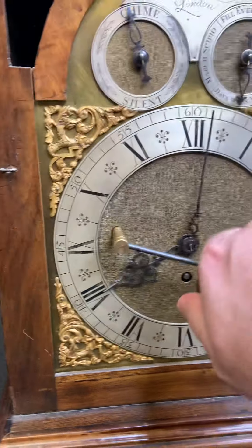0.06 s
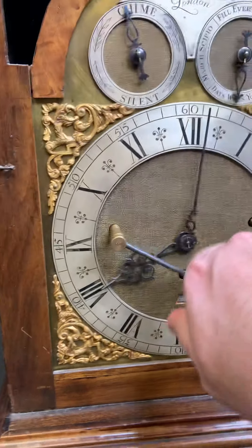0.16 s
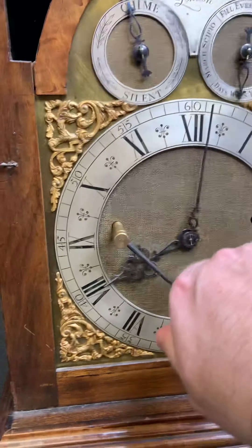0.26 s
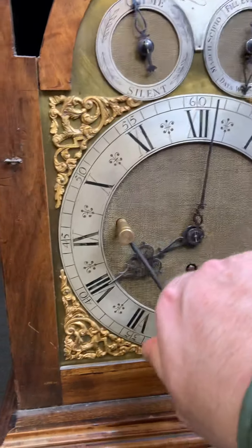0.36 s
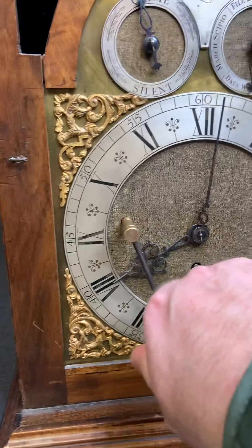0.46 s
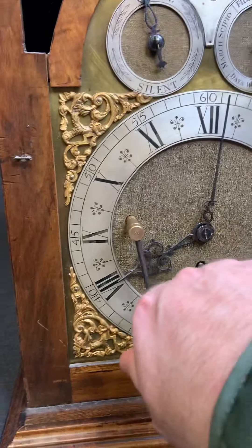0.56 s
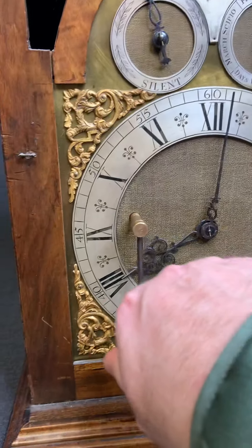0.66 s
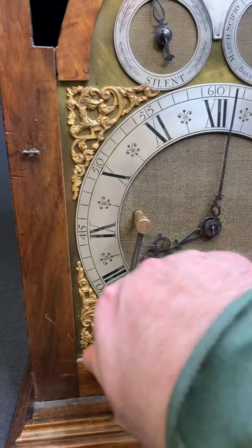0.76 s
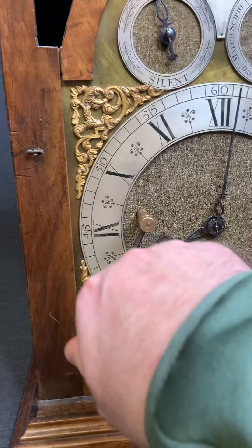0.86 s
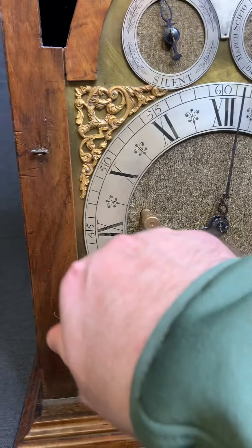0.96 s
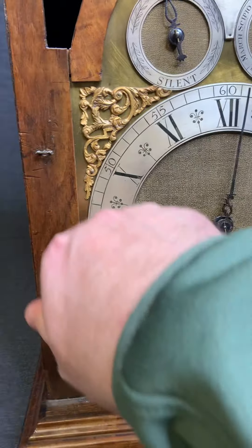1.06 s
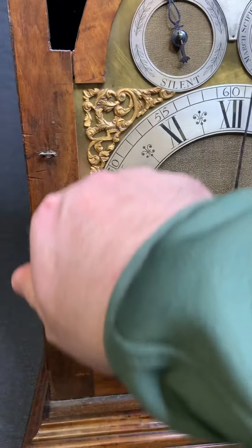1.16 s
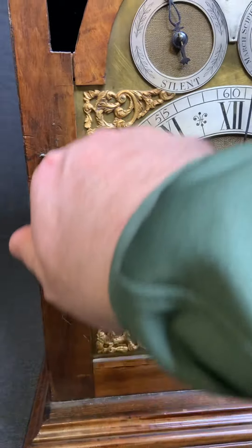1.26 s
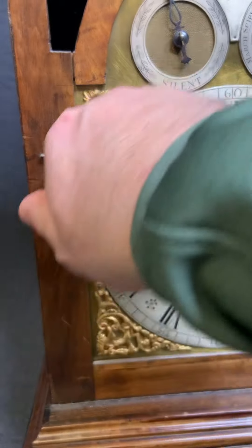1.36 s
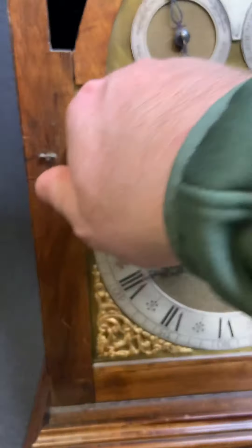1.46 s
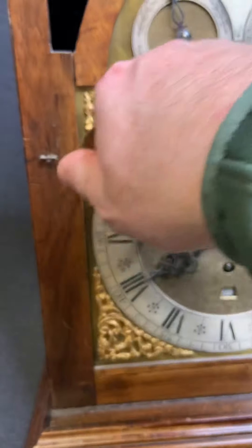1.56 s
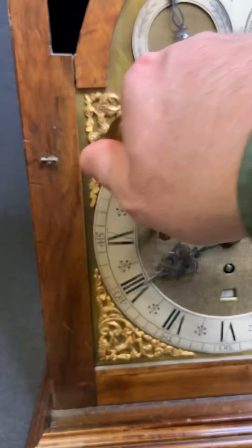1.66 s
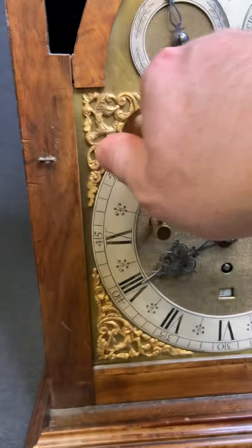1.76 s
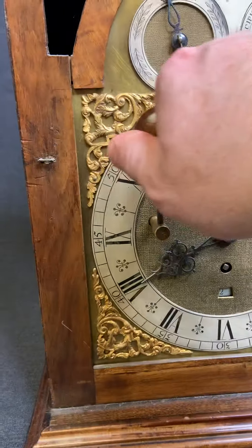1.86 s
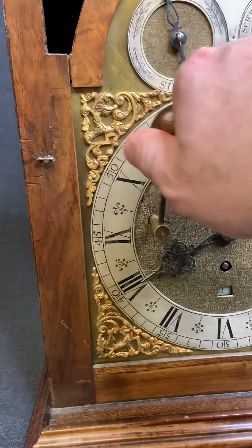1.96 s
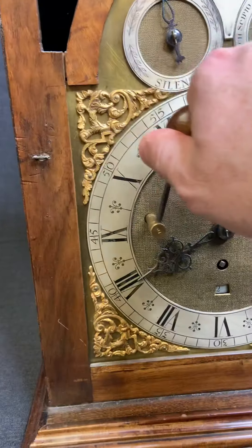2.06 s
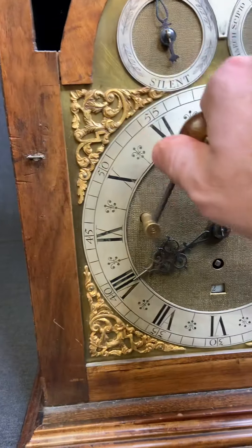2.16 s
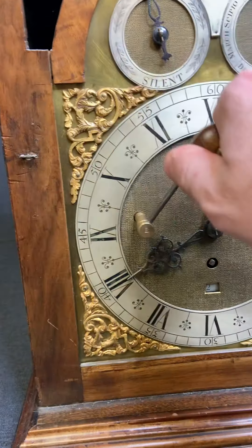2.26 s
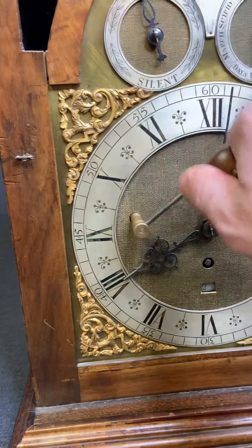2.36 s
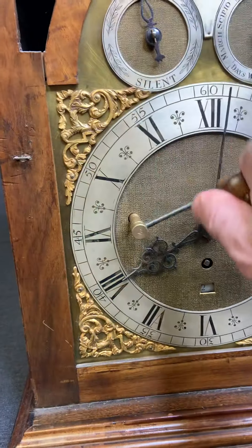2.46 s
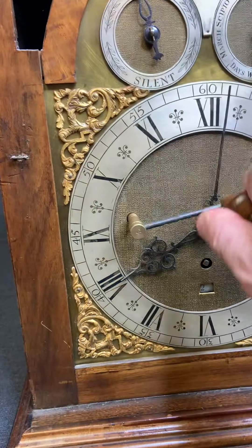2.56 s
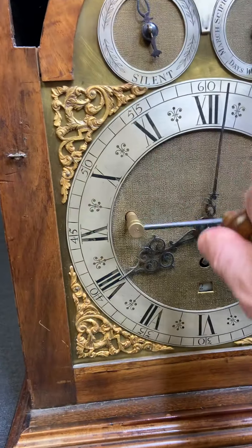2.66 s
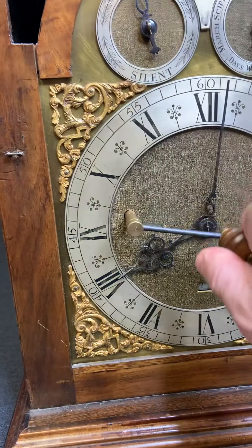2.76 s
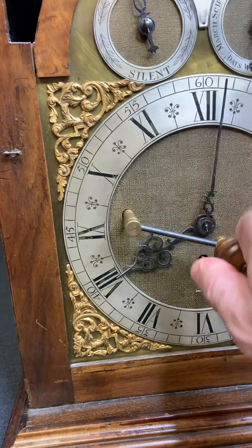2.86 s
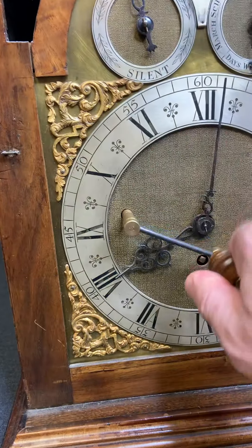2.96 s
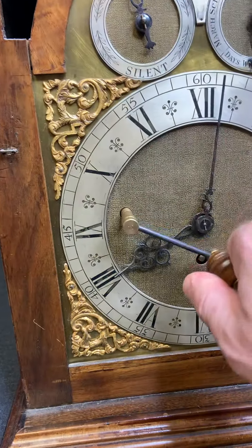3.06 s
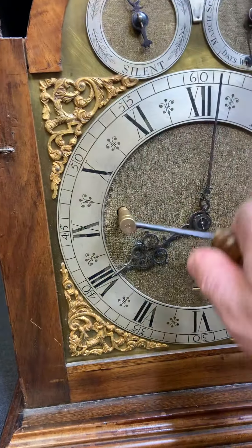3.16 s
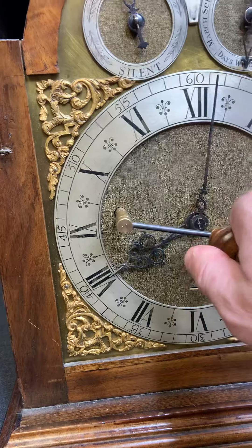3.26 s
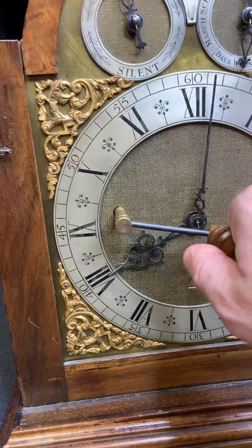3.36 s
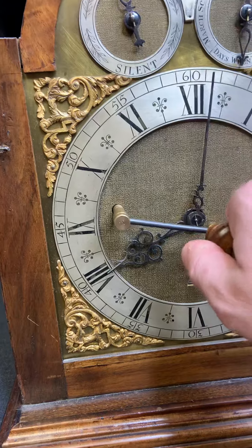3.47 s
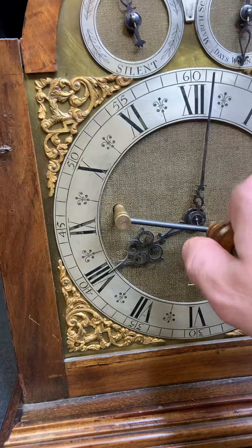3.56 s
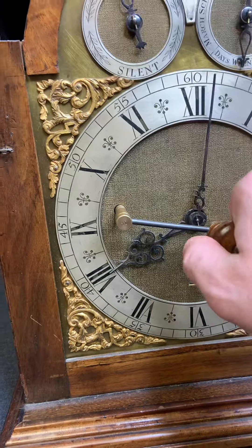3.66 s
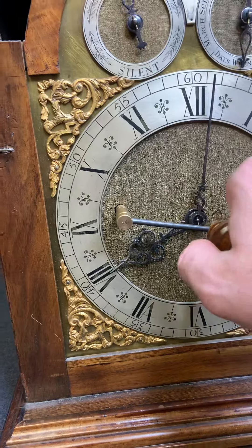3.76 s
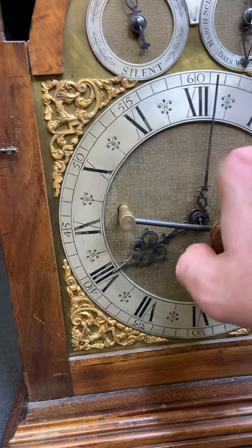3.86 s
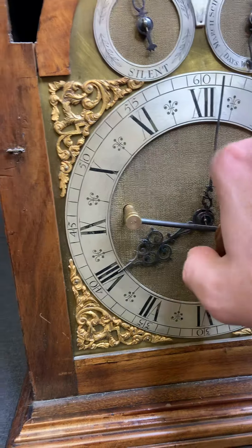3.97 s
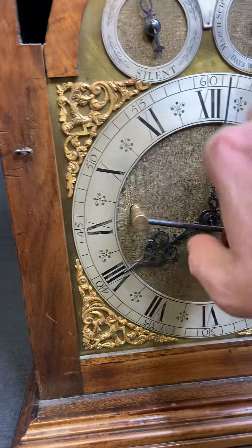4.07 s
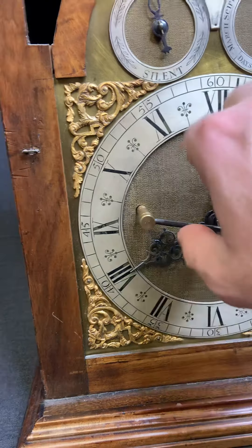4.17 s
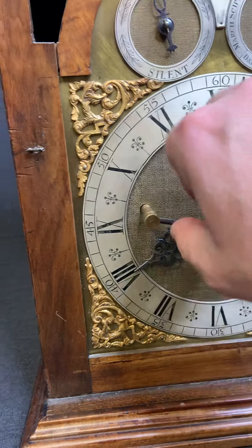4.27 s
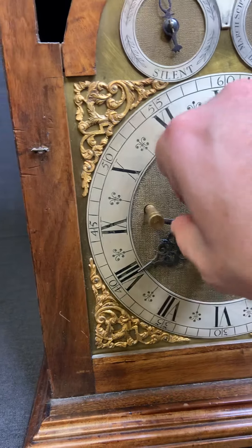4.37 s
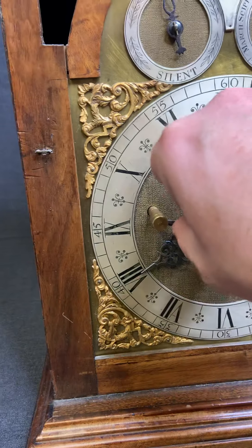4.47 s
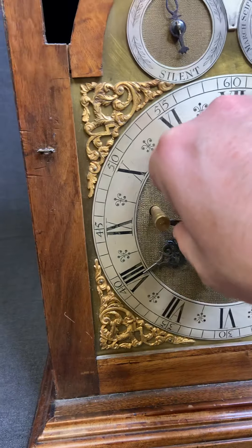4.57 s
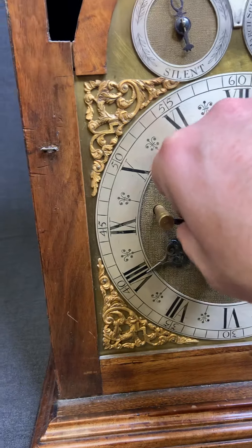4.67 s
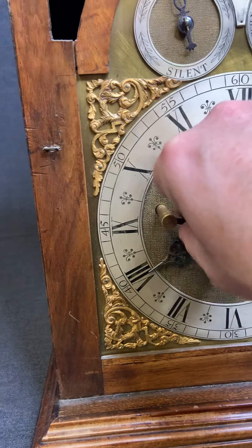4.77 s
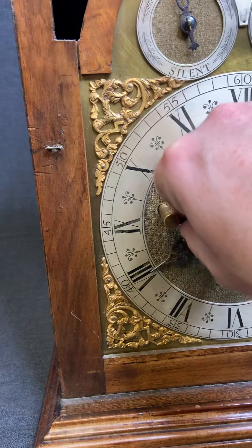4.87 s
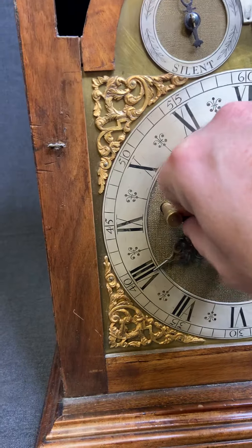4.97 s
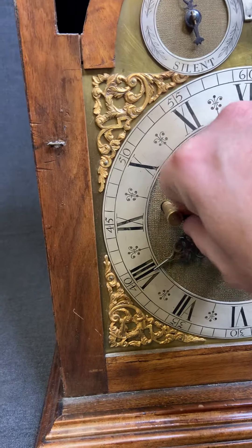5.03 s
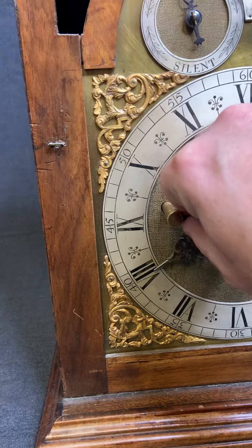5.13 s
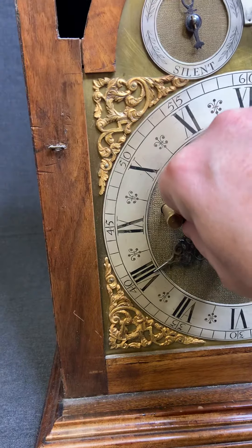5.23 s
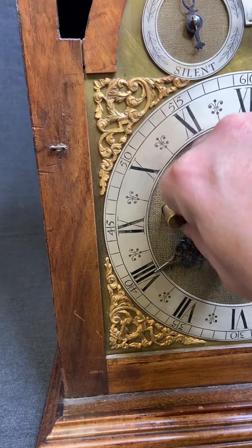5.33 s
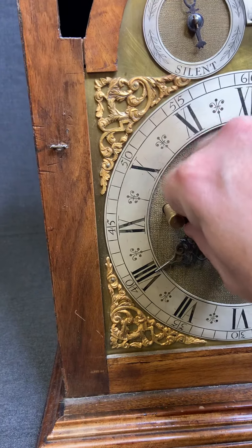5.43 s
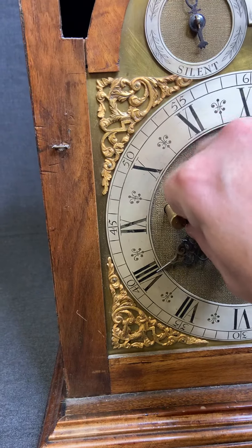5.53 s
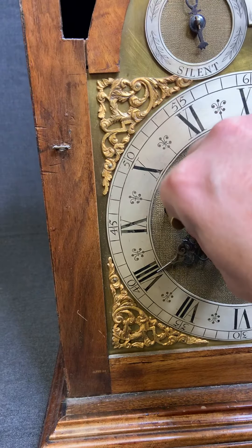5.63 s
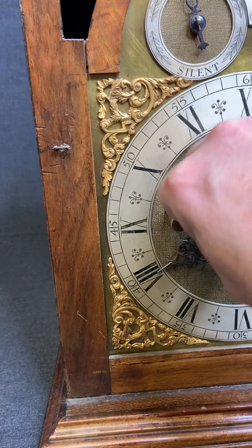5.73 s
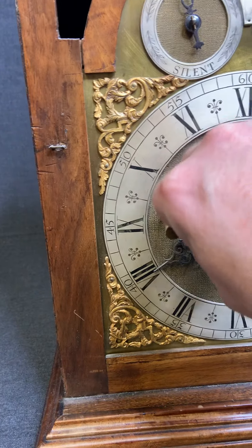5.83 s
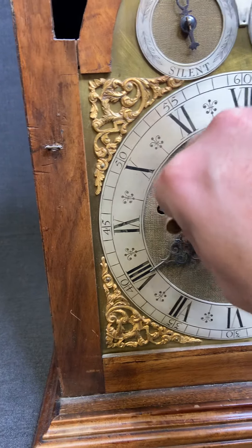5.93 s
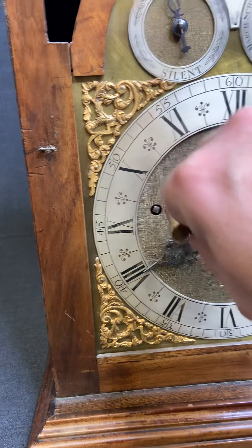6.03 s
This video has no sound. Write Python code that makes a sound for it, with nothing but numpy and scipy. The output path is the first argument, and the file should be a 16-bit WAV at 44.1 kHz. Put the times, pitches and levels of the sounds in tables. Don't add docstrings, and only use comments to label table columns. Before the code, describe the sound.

Crisp rapid ratchet clicks from winding a wooden clock, a clunk and metallic slide back, quiet ticking, then the key bumps free.

```python
import sys
import numpy as np
from scipy import signal
from scipy.fft import rfft, irfft, next_fast_len
from scipy.io import wavfile
from scipy.ndimage import uniform_filter1d, map_coordinates

SR = 44100
rng = np.random.default_rng(int(sys.argv[2]) if len(sys.argv) > 2 else 0)


def gain_from_db(level_db):
    decades = np.asarray(level_db, float) / 20
    return 10 ** decades


def master_out(mix):
    frames = np.transpose(np.atleast_2d(mix))
    ceiling = np.clip(frames, -1, 1)
    pcm = np.round(ceiling * 32767).astype(np.int16)
    wavfile.write(sys.argv[1], SR, pcm)


N = 268999
BANDS_HZ = [0, 1500, 4000, 8200, SR]


def unit(x):
    return x / np.sqrt(np.mean(x ** 2) + 1e-20)


def along(f, v, hz):
    return np.interp(np.log(hz + 1), np.log(np.add(f, 1)), v)


def level_curve(rows):
    s, db = np.transpose(rows)
    silence_db = -70 * np.log(10)
    return np.interp(np.arange(N) / SR, s, db, left=silence_db, right=silence_db)


def wobble(rate_hz):
    knots = rng.standard_normal(int(N * rate_hz / SR) + 4)
    return map_coordinates(knots, [np.arange(N) * rate_hz / SR])


def noise():
    return rng.standard_normal((2, N))


def filtered(x, response):
    size = next_fast_len(N + SR // 2)
    spectrum = rfft(x, size) * response(np.fft.rfftfreq(size, 1 / SR))
    return irfft(spectrum, size)[..., :N]


def ringing(f, modes):
    centre_hz, width_hz, db = np.transpose(modes)
    f = f[:, None]
    sign = (-1) ** np.arange(len(centre_hz))
    damping = 1j * f * width_hz
    h = sign * gain_from_db(db) * damping / (centre_hz ** 2 - f ** 2 + damping)
    return h / np.sqrt(np.mean(np.abs(h.sum(-1)) ** 2))


def body(x, modes):
    return filtered(x, lambda f: ringing(f, modes).sum(-1))


def patches(x, depth_db):
    z = signal.stft(x, nperseg=256)[2]
    field = rng.standard_normal(z.shape[1:])
    field = uniform_filter1d(uniform_filter1d(field, 5, 0), 12, 1)
    return signal.istft(z * gain_from_db(depth_db * unit(field)), nperseg=256)[1][:, :N]


def strikes(events, modes, edges_hz, rise_s, fall_s, rattle_db, part_db, spread_db, soft_hz):
    size = 8192
    hold = 0.39
    grain_db = 3.5
    t, f = np.arange(size) / SR, np.fft.rfftfreq(size, 1 / SR)
    contact = 1 / (1 + 1j * f / soft_hz) ** 3
    out = np.zeros((2, N + size))
    lumps = gain_from_db(grain_db * np.repeat(rng.standard_normal((len(events), size // 64)), 64, axis=1))
    for k, (lo, hi) in enumerate(zip(edges_hz, edges_hz[1:])):
        heavy = max(8000 / hi, 1) ** 0.31
        passed = contact / (1 + 1j * f / (2 * hi))
        part = ringing(f, [m for m in modes if lo < m[0] < hi]) * passed[:, None]
        attack = np.minimum(t / (rise_s * heavy), 1) ** 2.25
        after = np.maximum(t - (1 + hold) * rise_s * heavy, 0)
        blow = gain_from_db(-60 * after / (fall_s * heavy))
        rattle = gain_from_db(rattle_db - 60 * after / 0.22)
        chatter = attack * (blow + rattle)
        for (s, db, *rel_db), lump in zip(events, lumps):
            strength = gain_from_db(spread_db * rng.standard_normal(part.shape[1]))
            if lo > 3000:
                strength = strength * rng.choice([-1, 1], part.shape[1])
            grains = lump * rng.standard_normal((2, size))
            ring = irfft(rfft(chatter * grains) * (part @ strength), size)
            ring = ring * np.linalg.norm(chatter) / np.linalg.norm(ring, axis=1, keepdims=True)
            start = round((s - 0.6 * rise_s) * SR)
            out[:, start:start + size] += gain_from_db(db + [*rel_db, 0][k] + part_db[k]) * ring
    return out[:, :N]


def air():
    # frequency in Hz, density in dB per Hz
    air_density = [(25, -12), (55, -5), (90, 0.8), (160, -10.5), (240, -6.5), (330, -21.5), (450, -27),
                   (750, -38.5), (1500, -39.5), (3500, -42), (6000, -43.5), (11000, -44.5), (15000, -50)]
    # frequency in Hz, width in Hz, rms level in dB
    hum_lines = [(56.7, 20, -63), (118.8, 7.9, -62), (238.8, 38, -69.5)]
    hiss = unit(filtered(noise(), lambda hz: gain_from_db(along(*np.transpose(air_density), hz))))
    out = gain_from_db(-62.0 + 0.17 * wobble(2.93)) * hiss
    for hz, width_hz, db in hum_lines:
        line = [(hz, width_hz, 0)]
        out = out + gain_from_db(db) * unit(body(body(noise(), line), line))
    return out


def room(x):
    # frequency in Hz, t60 in seconds
    decay = [(200, 0.36), (1500, 0.12), (5000, 0.085), (15000, 0.013)]
    out, step = np.zeros((2, N + SR)), SR // 4
    for s in range(0, N, step):
        hz, t, z = signal.stft(rng.standard_normal((2, SR // 3)), SR, nperseg=256)
        t60_s = along(*np.transpose(decay), hz)
        tail = signal.istft(z * gain_from_db(-60 * t / t60_s[:, None]), SR, nperseg=256)[1]
        wet = signal.fftconvolve(x[:, s:s + step], tail / np.linalg.norm(tail[0]), axes=1)
        delay = 200
        out[:, s + delay:s + delay + wet.shape[1]] += wet
    return out[:, :N]


def case_bumps():
    # time in seconds, peak in dB, boom in dB over it
    bumps = [(0.018, -51.5, 9), (3.104, -51, 3.5), (3.88, -65, 17), (4.997, -54.5, -8), (5.423, -53.5, -2),
             (5.592, -50.5, 9), (5.622, -61, 12), (5.646, -62, 15), (5.763, -46, 10), (5.809, -60.5, 14.5),
             (5.831, -56, 5.5), (5.862, -71, 9)]
    # frequency in Hz, width in Hz, level in dB
    case_modes = [(116.6, 46, -5), (187.4, 40, -6.5), (233, 28, -0.5), (306, 34, 1.5), (485, 330, -3),
                  (707, 75, 3), (834, 87, -7.5)]
    return strikes(bumps, case_modes, [0, 400, 1500], rise_s=0.004, fall_s=0.02, rattle_db=-26.5,
                   part_db=[-2.5, -4], spread_db=1.0, soft_hz=844)


def crank_stop():
    # time in seconds, ring in dB, boom and clank in dB over it
    swings = [
        (3.11, -61.5, -3, -13),
        (3.182, -66.5, 27.5, 21.5),
        (3.255, -56, -4.5, -6),
    ]
    # frequency in Hz, width in Hz, level in dB
    arm_modes = [(237, 22, 0), (300, 40, -5), (720, 90, -6), (797, 40, 0), (872, 5.5, 1)]
    return strikes(swings, arm_modes, [0, 400, 840, 1500], rise_s=0.0011, fall_s=0.0107, rattle_db=-20.5,
                   part_db=[6, 6, 6], spread_db=-4.9, soft_hz=1525)


def key_knocks():
    # time in seconds, peak in dB, hardness (treble over middle) in dB
    knocks = [(2.022, -49.5, -25), (3.105, -44.5, -12.5), (3.1773, -35.5, -22.5), (3.185, -54, -26),
              (3.251, -54, 11.5), (3.8483, -43.5, -23), (3.867, -97, 6), (3.8906, -49.5, -21),
              (3.945, -73.5, 15), (5.753, -47, -6.5), (5.804, -54.5, -13.5), (5.8302, -46.5, -27.5)]
    # frequency in Hz, width in Hz, level in dB
    key_modes = [(730, 680, -10.5), (858, 120, -1.5), (1270, 500, -23), (1530, 82, 10), (2120, 470, 6.5),
                 (2870, 70, 12), (3150, 850, 0), (4170, 1200, 9), (5940, 1500, 12), (6590, 450, -23.5),
                 (10800, 6700, 75), (14000, 1800, 10.5)]
    hard_share = (0.17, 0, 0.82, 0.9)
    pin = hard_share[-1]
    over_pin = np.array(hard_share[:-1]) - pin
    blows = [(s, db + hard * pin, *(hard * over_pin)) for s, db, hard in knocks]
    return strikes(blows, key_modes, BANDS_HZ, rise_s=0.0033, fall_s=0.03, rattle_db=-14,
                   part_db=[-9.5, -14.5, -2, -9.5], spread_db=-1.0, soft_hz=53000)


def shaft_pings():
    # time in seconds, peak in dB
    pings = [
        (5.755, -41.5),
        (5.806, -44),
    ]
    # frequency in Hz, width in Hz, level in dB
    shaft_modes = [(2240, 170, 0), (2660, 200, -22)]
    return strikes(pings, shaft_modes, [0, 4000], rise_s=0.00047, fall_s=0.0069, rattle_db=-36,
                   part_db=[0], spread_db=-5.0, soft_hz=20000)


def key_scrape():
    # time in seconds, level in dB
    scrape = [(0.0, -58.5), (0.036, -57), (0.074, -62), (0.125, -67), (0.145, -66)]
    # frequency in Hz, width in Hz, level in dB
    socket_modes = [(504, 92, 7.5), (1460, 120, -2), (1690, 140, -5.5), (3310, 280, 1)]
    return gain_from_db(level_curve(scrape) - 0.5) * unit(body(grip() * noise(), socket_modes))


def beats(rows, unlock, drop):
    contacts = []
    for s, db, lead_s in rows:
        contacts.append((s, db + drop[0], *drop[1:]))
        contacts.append((s - lead_s, db + unlock[0], *unlock[1:]))
    return contacts


def escapement():
    # drop time in seconds, level in dB, lead of the unlocking in seconds
    ticks = [(0.0367, -58, 0.012), (1.66, -55, .013), (3.2864, -53, 0.0071), (4.1012, -56, 0.02),
             (4.9096, -55.5, 0.018), (5.7251, -53.5, .0166)]
    tocks = [(0.4357, -51, 0.015), (3.6795, -53.5, 0.014), (4.5061, -53.5, .0121), (5.3244, -53, .0116)]
    # frequency in Hz, width in Hz, level in dB
    wheel_modes = [(284.6, 49, 7.5), (618, 79, -5), (837, 32, -3.5), (1160, 95, -5.5), (1950, 420, 4),
                   (2340, 86, 6), (2564, 53, 6.5), (3870, 40, 6.5), (4290, 190, -2), (4230, 290, 19)]
    pallet_modes = [(5200, 220, 5), (5160, 48, -6.5), (6650, 290, -4.5), (8180, 740, -46), (12000, 190, -6),
                    (14600, 350, -1), (16950, 610, -8)]
    # pallet dB over the beat level, then case, dial and plates dB over the pallet
    contacts = beats(ticks, unlock=(-5, -7, 2, 0), drop=(0, -5.5, -6.5, -12))
    contacts += beats(tocks, unlock=(-4.5, 0.5, 1, -1), drop=(4.5, -11, -14, -17))
    return strikes(contacts, wheel_modes + pallet_modes, BANDS_HZ, rise_s=0.003, fall_s=0.06,
                   rattle_db=-27.0, part_db=[0.5, -5.5, 4, -9.0], spread_db=3, soft_hz=59800)


def grip():
    return gain_from_db(1.5 * wobble(45) + 2.2 * wobble(140))


def wheel_slide():
    # time in seconds, level in dB
    slide = [(3.26, -77), (3.275, -85), (3.356, -73), (3.44, -70.5), (3.74, -61.5), (3.868, -63),
             (3.951, -66), (3.97, -84), (4.02, -91)]
    # frequency in Hz, width in Hz, level in dB
    wheel_modes = [(4610, 254, -3), (5400, 250, -4.5), (6800, 930, -14), (7120, 240, -8), (8080, 28, 4),
                   (9400, 190, -6.5), (9760, 190, -3), (10800, 300, -5), (11540, 1100, -14.5),
                   (13050, 220, -5), (14250, 200, 1.5), (14100, 170, -3), (15330, 160, -5.5)]
    wood_modes = [(274.5, 33, 9.5), (753, 190, 1), (1810, 520, -6), (2253, 650, -8.5)]
    rumble_db, follow = -38, 0.84
    case_rows = [(s, rumble_db + follow * (db - rumble_db)) for s, db in slide]
    rub = grip()
    steel = unit(body(patches(rub * noise(), depth_db=2.5), wheel_modes))
    case = unit(body(rub * noise(), wood_modes))
    return gain_from_db(level_curve(slide) + 6) * steel + gain_from_db(level_curve(case_rows) - 3.5) * case


def wheel_mesh(times_s, speed_oct):
    # frequency in Hz, width in Hz, level in dB
    mesh_modes = [(567, 690, 9), (1220, 900, 6.5), (1770, 1000, 4), (3400, 2100, -3.5), (5610, 2400, -5.5),
                  (12000, 5000, -40.5)]
    stop_s = 0.08
    turning_db = -64.5 + 9 * speed_oct
    turning = [(0, turning_db[0]), *zip(times_s[:-1], turning_db), (times_s[-2] + stop_s, -100)]
    grit = gain_from_db(1.5 * wobble(25) + 3 * wobble(200))
    climb = np.interp(np.arange(N) / SR, times_s, np.arange(len(times_s))) % 1
    level_db = level_curve(turning) + 6 * climb ** 3 - 9.5
    return gain_from_db(level_db) * unit(body(patches(grit * noise(), depth_db=4.0), mesh_modes))


def teeth():
    # time in seconds, pawl level in dB, barrel level in dB
    pawl_drops = [(0.151, -38, -43.5), (0.221, -34.5, -43.5), (0.2946, -33.5, -45), (0.3746, -37.5, -47.5),
                  (0.4749, -36.5, -44), (0.5862, -35, -47.5), (0.6766, -33.5, -45.5),
                  (0.7526, -36.5, -47.5), (0.8342, -36, -42), (0.9188, -34, -40), (0.9918, -37.5, -40.5),
                  (1.0464, -36, -42.5), (1.0945, -33.5, -38.5), (1.143, -31.5, -45.5),
                  (1.195, -31.5, -48.5), (1.2474, -35.5, -48.5), (1.2998, -33.5, -45),
                  (1.353, -33, -43), (1.4184, -34.5, -46), (1.493, -34, -45), (1.5729, -34, -52),
                (1.6601, -32.5, -52.5), (1.7711, -32.5, -45), (1.922, -32, -45.5), (2.0409, -30.5, -44.5),
                (2.14, -31.5, -46), (2.2408, -30.5, -44), (2.3154, -27, -46.5), (2.383, -27, -44.5),
                (2.4545, -32.5, -54), (2.5485, -28, -46.5), (2.6432, -30, -45), (2.7255, -31, -44.5),
                (2.8657, -33, -44.5)]
    # time in seconds, level in dB
    push = [(0.15, -52), (0.4, -53.5), (0.6, -49), (1.05, -47), (1.45, -48.5), (1.75, -46), (2.3, -44),
            (2.55, -50.5), (2.87, -48)]
    s, pawl_db, barrel_db = np.transpose(pawl_drops)
    usual_hz = 12
    speed_oct = np.log2(1 / np.gradient(s) / usual_hz)
    thud_db = -51.5 + 1.5 * speed_oct
    dial_db = np.interp(s, *np.transpose(push))
    plates_db = -50.5 + 0.5 * rng.standard_normal(len(s))
    parts_db = [thud_db, dial_db, plates_db, barrel_db]
    return np.transpose([s, pawl_db, *(parts_db - pawl_db)]), speed_oct


def ratchet(drops):
    # frequency in Hz, width in Hz, level in dB
    frame_modes = [(277.8, 32.8, 2.5), (333.5, 41, -2.5), (558.5, 39, -11), (683, 23, -11.5),
                   (877, 70, -10), (1125, 53, -9), (1370, 63, -10.5), (1619, 68, -3.5), (1848, 44, 0),
                   (2070, 87, 2), (2713, 150, -2.5), (3760, 170, -5)]
    plate_modes = [(4300, 300, -5), (4600, 250, 0), (5040, 250, 0), (5390, 120, -2), (5860, 400, -4),
                   (6850, 400, -1), (7600, 500, -4)]
    pawl_modes = [(8600, 600, -9), (9400, 500, -10), (10040, 300, -8), (10470, 150, -6), (11192, 90, 1),
                  (11460, 60, -6), (12050, 200, -5), (12900, 600, -8), (13700, 600, -9), (14580, 150, -4),
                  (15130, 300, -5), (15450, 200, -5)]
    return strikes(drops, frame_modes + plate_modes + pawl_modes, [0, 1500, 4000, 5600, 8200, SR],
                   rise_s=0.005, fall_s=0.018, rattle_db=-26, part_db=[4.5, 2.5, 6.0, 1.0, -4],
                   spread_db=3.0, soft_hz=63000)


def scene():
    drops, speed_oct = teeth()
    near = case_bumps() + crank_stop() + key_knocks() + shaft_pings() + key_scrape()
    near = near + escapement() + wheel_slide() + wheel_mesh(drops[:, 0], speed_oct) + ratchet(drops)
    return near + gain_from_db(-9.5) * room(near) + air()


def low_pass(x):
    return signal.sosfilt(signal.butter(12, 16970, fs=SR, output="sos"), x)


def record(dry):
    # frequency in Hz, likeness 0-1, left minus right in dB, lead of the right in radians
    ports = [(100, .99, .4, .05), (340, .96, 0, .35), (520, .5, -4.5, 1.9), (800, .7, -5.5, 1.4),
             (1120, .75, -7.5, 1.5), (1500, .5, -.5, .2), (1900, .7, -3, -.2), (2300, .7, 0, -1),
             (2900, .4, -1.5, -1.9), (3500, .85, 0, -1.7), (4200, .997, 0, -2.3)]
    lag_s = 242e-6
    f, alike, tilt_db, lead_rad = np.transpose(ports)

    def shares(hz):
        turn = np.arccos(np.clip(along(f, alike, hz), 0, 1)) / 2
        return np.array([np.cos(turn), np.sin(turn)])

    def port_response(hz):
        phase = along(f, lead_rad, hz) - 2 * np.pi * lag_s * np.maximum(hz - f[-1], 0)
        left = gain_from_db(along(f, tilt_db, hz) / 2) * np.exp(-0.5j * phase)
        band_limit = 1 / (1 + (hz / 15750) ** 40)
        return left ** np.array([[1], [-1]]) * band_limit

    common, apart = filtered(dry, shares)
    mix = filtered(np.array([common + apart, common - apart]), port_response)
    return low_pass(mix)


dry = scene()
out = record(dry)
master_out(out)
```